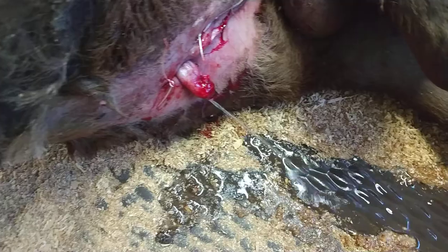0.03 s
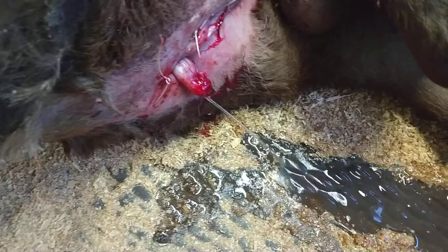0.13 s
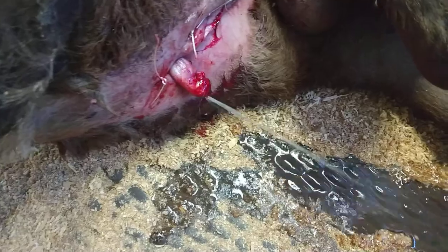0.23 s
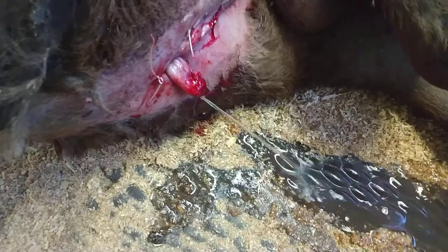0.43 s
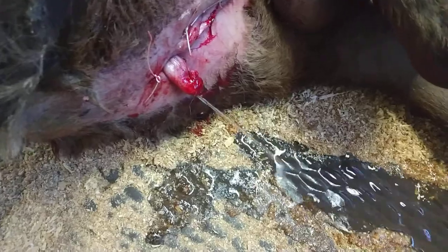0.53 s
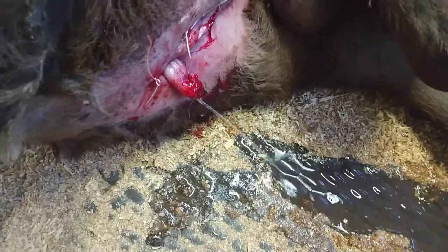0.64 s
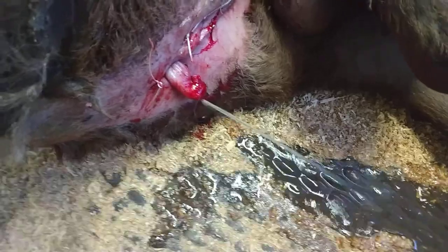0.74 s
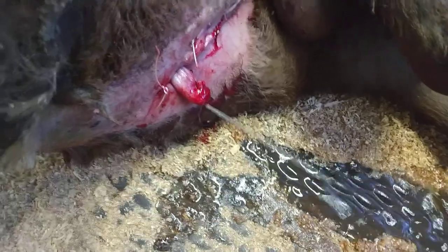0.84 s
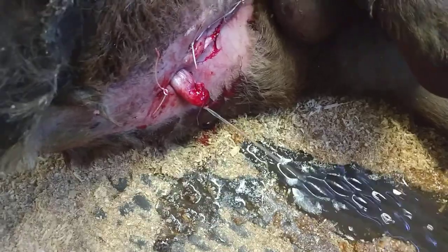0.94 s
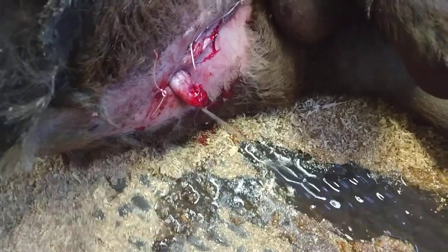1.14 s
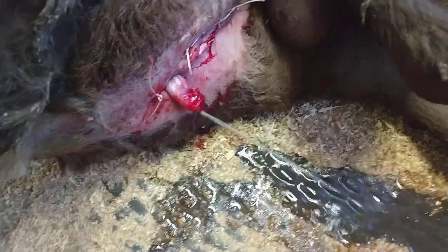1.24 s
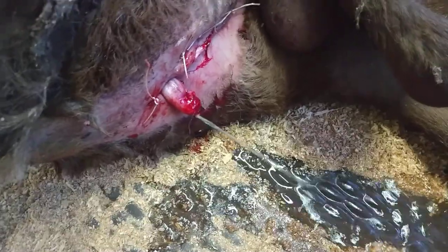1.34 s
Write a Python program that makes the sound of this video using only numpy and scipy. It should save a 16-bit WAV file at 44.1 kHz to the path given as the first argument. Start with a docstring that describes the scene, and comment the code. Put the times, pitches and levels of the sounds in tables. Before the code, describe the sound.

Sharp handling knocks come in three short clusters as fingers shift on a camera, very close to the microphone. Behind them, a thin stream of liquid trickles faintly onto stone in the low, steady noise of an animal shed.

```python
"""The low, steady noise of an animal shed fades in, with a thin stream of liquid trickling onto stone:
hundreds of tiny pinging drops a second. Almost at once fingers shift on a hand-held camera, dry and
very close to the microphone. Its case clicks and knocks in clusters as they press and release, skin
slips in a fine crackle, and the camera rocks with a low thump after the heavy knocks.
The fingers settle, leaving the trickle, a few brighter spatters and the shed."""
import sys
import numpy as np
from scipy import signal
from scipy.io import wavfile
from scipy.ndimage import uniform_filter1d

SR = 44100
rng = np.random.default_rng(int(sys.argv[2]) if len(sys.argv) > 2 else 0)


def bounce(signal):
    """Save signal as a 16-bit WAV file at the path given by the first command-line argument."""
    frames = np.transpose(np.atleast_2d(signal))
    limited = np.clip(frames, -1, 1)
    pcm = np.round(limited * 32767).astype(np.int16)
    wavfile.write(sys.argv[1], SR, pcm)


N = 61739

RING_HZ, RING_WIDTH_HZ = 3520, 190  # small cavity in front of the microphone
KNOCK_RING_DB, BACKGROUND_RING_DB = 7.5, 8.5


def amp(db):
    """Decibels to gain."""
    return 10 ** (np.asarray(db) / 20)


def eq_curve(points, hz):
    """Joins (Hz, dB) points on a log-frequency axis."""
    freqs, db = np.transpose(points)
    return np.interp(np.log(hz + 1), np.log(freqs + 1), db)


def unit_rms(x):
    """Scales to an rms of one."""
    return x / np.sqrt(np.mean(x ** 2) + 1e-20)


def add(mix, s, sound):
    """Mixes a sound in at s seconds."""
    part = mix[round(s * SR):][:len(sound)]
    part += sound[:len(part)]


def impulse(db):
    """Sharp-fronted, minimum-phase impulse response with the given spectrum."""
    log_gain = np.log(amp(np.r_[db, db[-2:0:-1]]))
    spectrum = np.exp(np.conj(signal.hilbert(log_gain)))
    return np.fft.ifft(spectrum).real[:len(db)]


def bins(size=8192):
    """Frequencies of a spectrum, in Hz."""
    return np.fft.rfftfreq(size, 1 / SR)


def cavity(hz, peak_db):
    """The narrow resonance of the microphone cavity, in dB."""
    detuning = 2 * (hz - RING_HZ) / RING_WIDTH_HZ
    return 10 * np.log10(1 + (amp(peak_db) ** 2 - 1) / (1 + detuning ** 2))


def case_knocks(bass_hz=305, body_hz=812, body_octaves=0.53):
    """Each press or release of a finger kicks the case; the softer the contact, the duller the knock."""
    # Finger contacts: (time [s], level [dB], direction [+1 press, -1 release], brightness [Hz],
    # treble roll-off [filter order], bass [dB], hollow body [dB])
    hits = [ (0.2332, 11.5, 1, 3870, 2, -5, -3), (.2367, -21, 1, 12000, 2.2, -26, -5),
            (0.2374, 10, -1, 13800, 2.7, 1, -3.5), (0.2412, 11, -1, 670, 2.85, 4, -1.5),
            (0.2445, 2, -1, 700, 2.9, -7, 0), (.4439, 16.5, 1, 3620, 1.6, -5.5, -5),
            (0.4464, 9.5, -1, 13000, 1.6, 2.5, 5), (0.4498, 13.5, -1, 550, 2.96, -4.5, -6.5),
            (0.4542, -1, 1, 696, 2.8, -9, 4.5), (.7544, 14.5, 1, 5300, 2, -5.5, -3.5),
            (0.7725, -3.5, 1, 14000, 2.3, -7, -11), (0.7763, 3, -1, 15100, 2.7, 8.5, 7),
            (0.8364, 0.5, -1, 1440, 1.8, 12, 3), (.8558, -9, 1, 9000, 1.2, 3, 7),
            (0.8566, 3, -1, 2800, 1.1, -5, -1), (.8630, 9.5, 1, 1600, 3.4, 0.5, 0.5),
            (0.8755, 7, -1, 650, 2.5, 2.5, -0.5), (.9089, -5, -1, 800, 0.94, 3, 7.5),
            (0.916, 11, 1, 7100, 4.9, 0, 7), (.9202, 10.5, -1, 600, 2.75, -2, -1.5), ]
    # Response of the case to a knock: (frequency [Hz], gain [dB])
    case_eq = [(20, -32), (55, 1), (105, 6), (200, 4), (400, 1), (900, -0.5), (1600, 0), (2500, -1.5),
               (3000, -11.5), (4200, -13), (6000, -15.5), (7600, -21), (9500, -40.5), (12000, -28.5),
               (15500, -22)]
    out, hz = np.zeros(N), bins()
    case = eq_curve(case_eq, hz) + cavity(hz, KNOCK_RING_DB)
    body = np.exp(-.5 * (np.log2((hz + 1) / body_hz) / body_octaves) ** 2)
    for s, db, direction, bright_hz, order, bass_db, body_db in hits:
        contact = -10 * np.log10(1 + (hz / bright_hz) ** (2 * order))
        weight = bass_db / (1 + (hz / bass_hz) ** 2) + body_db * body
        add(out, s, direction * amp(db) * impulse(case + contact + weight))
    return out


def camera_thumps(decay_s=.012):
    """The whole camera rocks in the hand after the heavy knocks: a low, quickly damped sine."""
    # Sways of the camera: (time [s], level [dB], pitch [Hz], direction [+1 or -1])
    sways = [(.244, -28.5, 79.4, -1), (.454, -30.5, 59, -1), (.779, -36, 75, -1), (0.927, -35.5, 64, -1)]
    out, t = np.zeros(N), np.arange(SR // 10) / SR
    for s, db, hz, direction in sways:
        add(out, s, direction * amp(db) * np.sin(2 * np.pi * hz * t) * np.exp(-t / decay_s))
    return out


def skin_slips(grains_per_s=3000):
    """Around the harder knocks the skin slips on the case in a few milliseconds of fine crackle."""
    # Slips of the skin: (time [s], length [s], level [dB], brightness [Hz])
    slips = [(0.2327, 0.0053, -29, 5000), (0.2413, 0.0024, -34, 12000), (0.4448, 0.0034, -28, 5000),
             (.4490, .005, -45, 8000), (0.755, 0.0034, -41, 3500), (0.7766, 0.0053, -53, 3000),
             (0.8726, 0.0093, -47.5, 2500), (0.9113, 0.0067, -38.5, 1200)]
    # Colour of the crackle: (frequency [Hz], gain [dB])
    crackle_eq = [(200, -9.5), (700, 2.5), (2400, 3), (3000, -1), (3600, 1.5), (6000, -10), (8000, -8),
                  (9500, -30), (15500, -26)]
    out, hz = np.zeros(N), bins()
    for s, length_s, db, bright_hz in slips:
        sizes, chance = rng.standard_normal(SR // 20), rng.random(SR // 20)
        grains = (sizes * (chance < grains_per_s / SR))[:round(length_s * SR)]
        tone = impulse(eq_curve(crackle_eq, hz) - 10 * np.log10(1 + (hz / bright_hz) ** 2))
        add(out, s, amp(db) * signal.fftconvolve(unit_rms(grains), tone / np.linalg.norm(tone)))
    return out


def spatters(decay_s=0.0016):
    """Larger drops burst on the stone in short, bright puffs."""
    # Drops that stand out of the trickle: (time [s], level before the fade-in [dB])
    drops = [(0.362, -27), (.403, -31), (.424, -36), (.481, -30), (.967, -31.5), (1.307, -32.5),
             (1.390, -31)]
    # Colour of a burst on stone: (frequency [Hz], gain [dB])
    burst_eq = [(300, -10), (1200, -4), (2800, 3), (4000, 3.5), (7200, -10), (9500, -12), (15500, -10)]
    puffs, hz, t = np.zeros(N), bins(), np.arange(SR // 20) / SR
    for s, db in drops:
        puff = rng.standard_normal(len(t)) * np.exp(-t / decay_s)
        add(puffs, s, amp(db) * puff / np.linalg.norm(puff))
    tone = impulse(eq_curve(burst_eq, hz) + cavity(hz, BACKGROUND_RING_DB))
    return signal.oaconvolve(puffs, tone)[:N]


def trickle(drops_per_s=550, spread_db=6.5, gain_db=-68):
    """The stream breaks into many tiny drops, each a brief damped ping."""
    low_hz, high_hz, pitches = 716, 6960, 24
    decay_cycles, tilt_db_per_octave = 3.4, -1.5
    out, t = np.zeros(N), np.arange(SR // 20) / SR
    for hz in np.geomspace(low_hz, high_hz, pitches):
        sizes = amp(spread_db * np.minimum(rng.exponential(1, N), 4))
        drops = sizes * (rng.random(N) < drops_per_s / pitches / SR)
        ping = np.sin(2 * np.pi * hz * t) * np.exp(-hz * t / decay_cycles)
        tilt = amp(tilt_db_per_octave * np.log2(hz / low_hz))
        out += tilt * signal.oaconvolve(drops, ping)[:N]
    return amp(gain_db) * unit_rms(out)


def shed_tone(gain_db=-47.5, drift_db=1, frame=1024):
    """Low, steady room tone with a little hiss, drifting in faint patches."""
    # Noise spectrum of the shed: (frequency [Hz], relative level [dB])
    room_eq = [(20, -28), (40, -8), (65, 1.5), (175, 0), (260, -11), (350, -7.5), (435, -5), (600, -12.5),
               (900, -14), (1400, -22), (2500, -25.5), (3000, -28), (4300, -28.5), (6200, -33.5),
               (7100, -30), (8200, -37.5), (9700, -41.5), (12500, -38), (15500, -37)]
    hz, hop = bins(frame), frame // 4
    real, imag, drift = rng.standard_normal((N // hop + 5, len(hz), 3)).T
    drift = uniform_filter1d(drift, size=12, axis=0)  # smooth across frequency
    drift = unit_rms(uniform_filter1d(drift, size=10, axis=1))  # and across time
    colour = eq_curve(room_eq, hz) + cavity(hz, BACKGROUND_RING_DB)
    spectra = (real + 1j * imag) * amp(colour[:, None] + drift_db * drift)
    _, noise = signal.istft(spectra, nperseg=frame, noverlap=frame - hop)
    return amp(gain_db) * unit_rms(noise[:N])


def scene(start_s=.087, open_s=.008):
    """Close handling noise over a bed of shed and trickle that opens from silence and fades in."""
    # Fade-in of the background: (time [s], gain [dB])
    fade_points = [(.09, -21), (.125, -13), (.2, -7.5), (.32, -2), (1.4, -0.88)]
    times, db = np.transpose(fade_points)
    t = np.arange(N) / SR
    fade = amp(np.interp(t, times, db)) * np.clip((t - start_s) / open_s, 0, 1)
    handling = case_knocks() + camera_thumps() + skin_slips()
    background = shed_tone() + trickle() + spatters()
    return (handling + fade * background)[None]


def record(dry):
    """A low cut and a steep high cut trim the deepest rumble and the very top."""
    low_cut = signal.butter(N=2, Wn=33, btype="highpass", fs=SR, output="sos")
    high_cut = signal.firwin(511, cutoff=16000, window=("kaiser", 9), fs=SR)
    return signal.oaconvolve(signal.sosfilt(low_cut, dry), high_cut[None], "same")


dry = scene()
out = record(dry)
bounce(out)
```